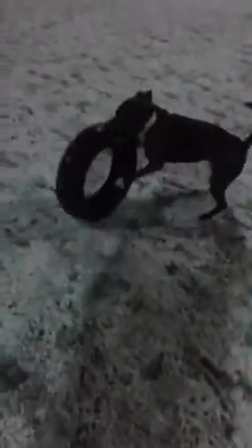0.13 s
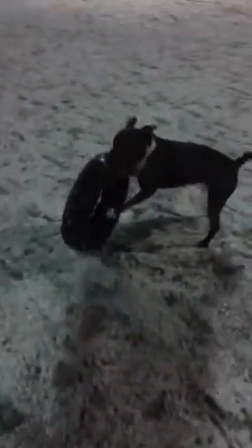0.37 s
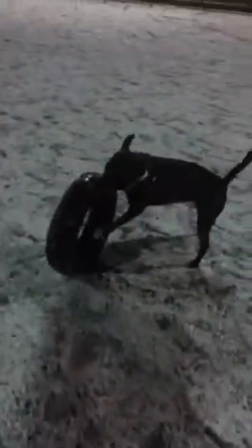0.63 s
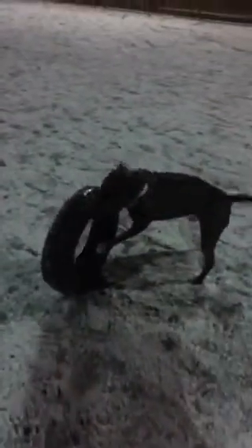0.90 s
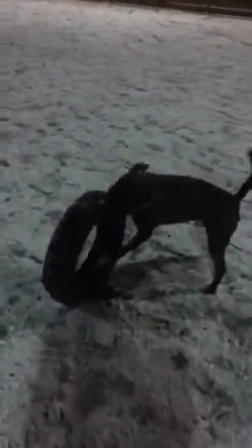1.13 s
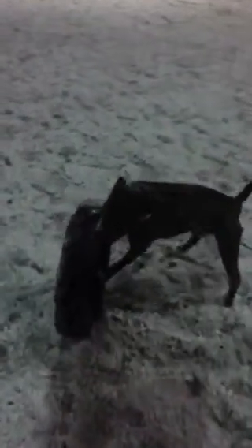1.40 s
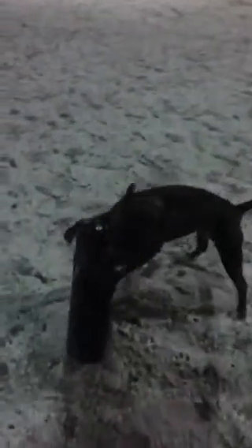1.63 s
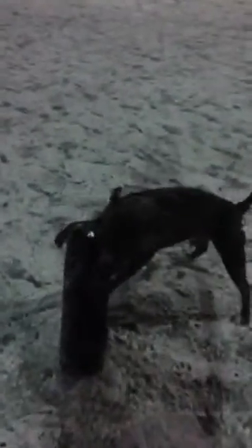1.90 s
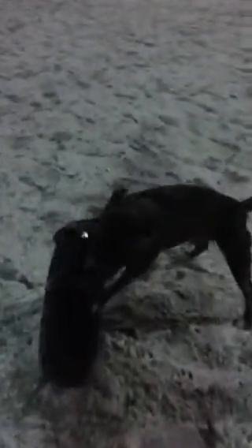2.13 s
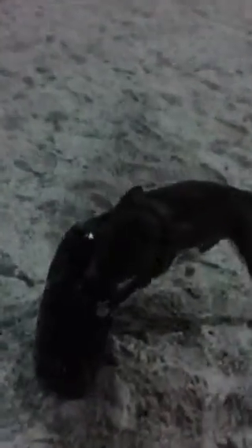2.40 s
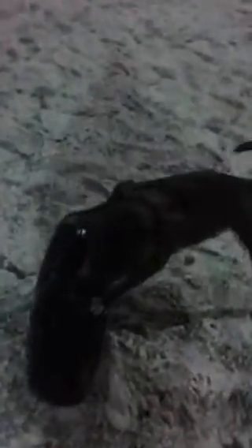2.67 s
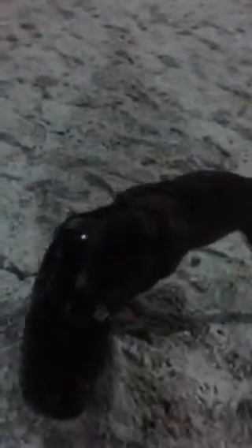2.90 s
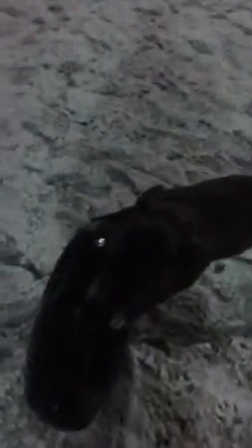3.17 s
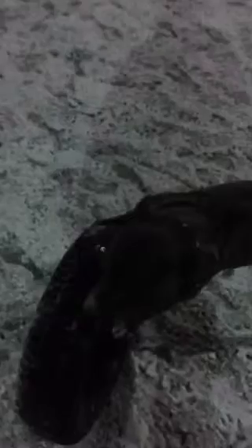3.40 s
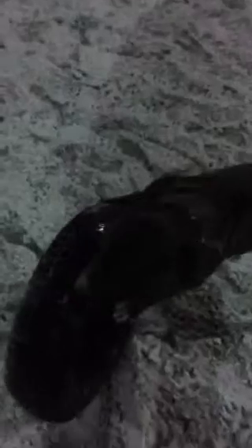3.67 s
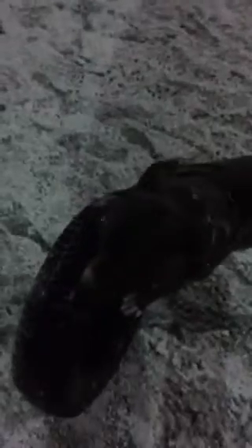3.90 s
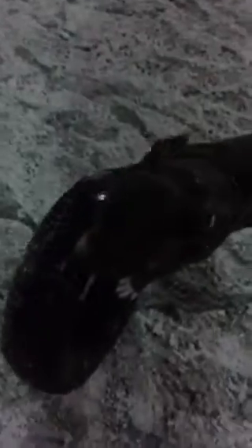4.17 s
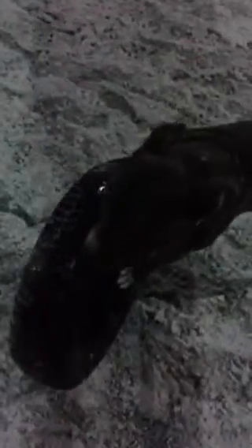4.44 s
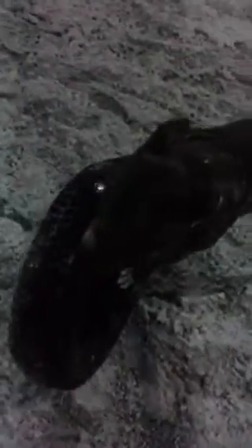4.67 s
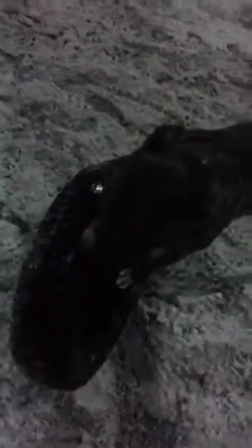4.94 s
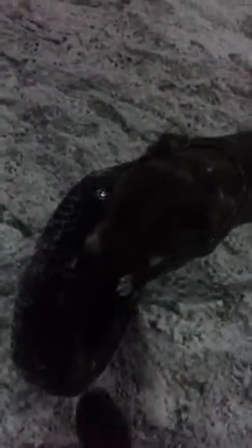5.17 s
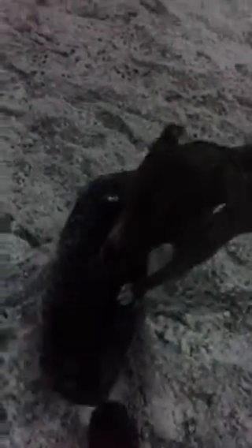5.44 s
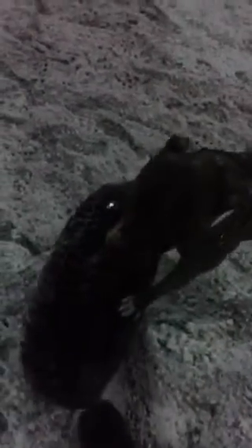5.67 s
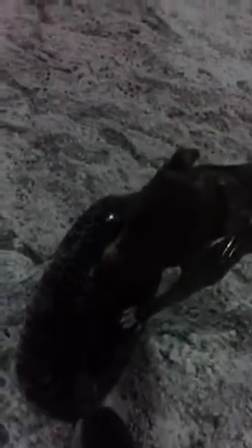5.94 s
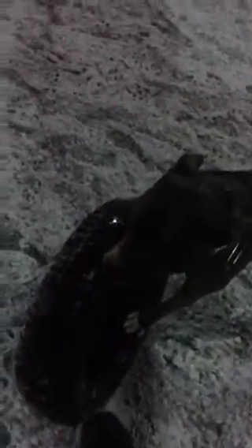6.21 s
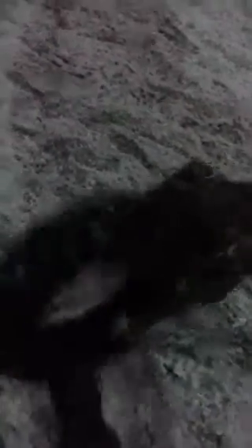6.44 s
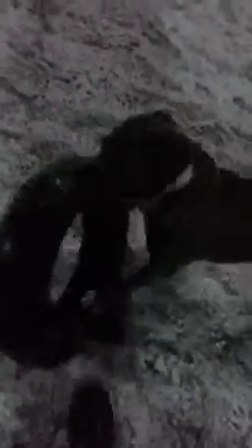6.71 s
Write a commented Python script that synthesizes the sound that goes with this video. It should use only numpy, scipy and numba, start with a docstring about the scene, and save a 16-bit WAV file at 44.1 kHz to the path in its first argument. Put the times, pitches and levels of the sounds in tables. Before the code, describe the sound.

Close outdoors, a dog growls with a tyre in its mouth. A clipped growl ends in a hiss, then paws scuff gritty ground and the tyre knocks once. A longer rattling growl follows with two soft thuds, a sigh and a faint snoring in-breath. Two more long growls surge in strength, separated by another sigh and a louder snore, over a faint low rumble.

```python
"""Open air, sand: a dog growls with a rubber tyre in its jaws.
Rough breath, chopped by the soft palate about 22 times a second, rings in chest, throat and mouth; teeth hiss.
The first three growls end in an unvoiced hiss; snoring breaths in follow the second and third.
Filtered noise makes open air, low rumble and scuffed sand. Decaying modes make the tyre's one knock,
damped low cycles its soft thuds on sand, band-passed clicks the teeth slipping on rubber."""
import sys
import numpy as np
from scipy import signal
from scipy.fft import rfft, irfft
from scipy.io import wavfile
from scipy.ndimage import map_coordinates
from numba import njit

SR = 44100
rng = np.random.default_rng(int(sys.argv[2]) if len(sys.argv) > 2 else 0)


def transcribe(signal):
    """Save signal, clipped to [-1, 1], as a 16-bit WAV file at the path in sys.argv[1]."""
    frames = np.atleast_2d(signal).T
    limited = np.clip(frames, -1, 1)
    pcm = np.round(limited * 32767).astype(np.int16)
    wavfile.write(sys.argv[1], SR, pcm)


def rack_gain(trim_db):
    """Turn a fader trim in dB into the linear factor to multiply a signal by."""
    fader = np.asarray(trim_db, float)
    return 10 ** (fader / 20)


N = 300756


def rms_one(x):
    """Scale to rms 1."""
    return x / np.sqrt(np.mean(x ** 2) + 1e-20)


def in_time(rows, outside=None):
    """Table columns as linear curves over time; ends hold unless outside is given."""
    s, *columns = np.transpose(rows)
    t = np.arange(N) / SR
    return [np.interp(t, s, column, outside, outside) for column in columns]


def drift(rate_hz):
    """Smooth random curve of spread about 1, with rate_hz knots a second."""
    knots = rng.standard_normal(400)
    return map_coordinates(knots, [np.arange(N) / SR * rate_hz + 3], order=3)


def coloured(spectrum):
    """Gaussian noise of rms 1, shaped by levels interpolated over log frequency."""
    hz, db = np.transpose(spectrum)
    grid_hz = np.maximum(np.arange(N // 2 + 1) * SR / N, 1)
    gain = rack_gain(np.interp(np.log(grid_hz), np.log(hz), db))
    return rms_one(irfft(rfft(rng.standard_normal(N)) * gain, N))


def peak(x, hz, width_hz):
    """Two-pole resonance, gain about 1 on top."""
    r = np.exp(-np.pi * width_hz / SR)
    feedback = [1, -2 * r * np.cos(2 * np.pi * hz / SR), r * r]
    return signal.lfilter([(1 - r * r) / 2, 0, (r * r - 1) / 2], feedback, x)


def resonances(x, table, wander_db=0.):
    """Parallel double resonances of alternating sign, each swelling alone; unswollen, white noise keeps its rms."""
    def double(v, hz, width_hz):
        """Two equal resonances in series, widened since the cascade narrows."""
        return peak(peak(v + 1e-18, hz, 1.69 * width_hz), hz, 1.69 * width_hz)

    impulse = np.eye(1, 8192)[0]
    response, out = 0, 0
    for k, (hz, width_hz, db) in enumerate(table):
        gain = (-1) ** k * rack_gain(db)
        response = response + gain * double(impulse, hz, width_hz)
        out = out + gain * double(x * rack_gain(wander_db * drift(7.9)), hz, width_hz)
    return out / np.sqrt(np.sum(response ** 2))


@njit
def glide(x, c, r):
    """Two-pole resonance whose centre moves with feedback c, pole radius r."""
    out = np.zeros(len(x))
    for i in range(2, len(x)):
        out[i] = x[i] - x[i - 2] + c[i] * out[i - 1] - r * r * out[i - 2]
    return out


def moving(x, hz, width_hz):
    """Double resonance with a moving centre; white noise of rms 1 comes out near rms 1."""
    r = np.exp(-np.pi * width_hz / SR)
    c = 2 * r * np.cos(2 * np.pi * hz / SR)
    top_one = glide(glide(x, c, r), c, r) * ((1 - r * r) / 2) ** 2
    return top_one * np.sqrt(2 * SR / (np.pi * width_hz))


def flapping(counts, breaths):
    """One row (s, level dB, dip dB) per palate flap; levels scatter, the last flap of a breath dips deep."""
    last_dip_db, scatter_db = 27, 0.96
    rows = []
    for count, breath in zip(counts, breaths):
        at_s, so_far = np.transpose(count)
        s = np.interp(np.arange(so_far[-1] + 1), so_far, at_s)
        knots_s, db, dip_db = np.transpose(breath)[:3]
        dips_db = np.r_[np.interp(s[:-1] + .02, knots_s, dip_db), last_dip_db]
        levels_db = np.interp(s, knots_s, db) + scatter_db * rng.standard_normal(len(s))
        rows += zip(s, levels_db, dips_db)
    return rows


def palate(flaps, depth, lead_s, hold_s=0.007, close_s=0.015, open_s=0.011):
    """Airway gain: opens for each flap, holds around it, then sags by depth times the dip; lead_s runs it early."""
    s, db, dip_db = np.transpose(flaps)
    gap_s = np.diff(s, append=s[-1] + 1)
    held_db, shut_db = db - 1.5, db - depth * dip_db
    shut_s = s + np.minimum(gap_s / 2, close_s)
    reopen_s = s + gap_s - np.minimum(gap_s / 2.2, open_s)
    times = np.stack([s - hold_s, s + hold_s, shut_s, reopen_s], 1).ravel()
    times = np.maximum.accumulate(np.r_[s[0] - hold_s - .003, times])
    # silent between breaths
    levels_db = np.stack([held_db, held_db, shut_db, np.where(gap_s > .12, -90, shut_db)], 1).ravel()
    levels_db = np.r_[-90, levels_db]
    return rack_gain(np.interp(np.arange(N) / SR + lead_s, times, levels_db, -120))


def folds(per_s, jitter, spread_db, noise):
    """Uneven vocal-fold slaps, each followed by a puff of turbulence; returns their mix and the puff envelope."""
    draws = rng.standard_normal((2500, 2))
    at = np.cumsum(SR / per_s * np.exp(jitter * draws[:, 0])).astype(int)
    slaps = np.zeros(N)
    slaps[at[at < N]] = rack_gain(spread_db * draws[at < N, 1])
    decay = np.exp(-1 / (0.005 * SR))
    puffs = rms_one(signal.lfilter([1], [1, -decay], slaps) + 0.24)
    turbulence = puffs * rng.standard_normal(N)
    return np.sqrt(1 - noise) * rms_one(slaps) + np.sqrt(noise) * turbulence, puffs


def air():
    """Steady open-air floor: coloured noise."""
    # spectrum: f/Hz, relative density/dB per Hz
    air_spectrum = [(18, -34), (30, -23), (123, -5), (332, -4), (1200, -6.5), (2000, -14.5), (3780, -22.5),
                    (5310, -28), (15500, -32)]
    return rack_gain(-57) * coloured(air_spectrum)


def rumble():
    """Lumpy lows of air and tugging: noise between about 60 and 135 Hz."""
    # t/s, level/dB
    rumble_levels = [(0, -54), (.09, -43), (.36, -53.5), (.68, -55), (.93, -52), (1.67, -49.5), (2.05, -41),
                     (2.18, -53), (2.66, -48), (4.25, -60.5), (4.42, -41), (4.55, -53), (5.0, -53),
                     (6.82, -57)]
    band = signal.butter(2, [60, 135], "band", fs=SR, output="sos")
    low = signal.sosfilt(band, rng.standard_normal(N))
    return rms_one(low * rack_gain(6.1 * drift(22))) * rack_gain(in_time(rumble_levels)[0])


def sand():
    """Paws scuff: dense random grain impulses ring the hollows in the sand."""
    # scuffs: t/s, level/dB
    scuff_levels = [(.27, -61), (.42, -64), (.445, -57), (.47, -60), (.51, -63), (.52, -49.5), (.58, -50),
                    (.6, -65), (.69, -56)]
    # hollows in the sand: f/Hz, width/Hz, relative level/dB
    grit = [(600, 400, 1), (1200, 180, 1), (1750, 210, -11), (2240, 280, -4), (3780, 770, -8.5)]
    grains_per_s = 4000
    struck = rng.random(N) < grains_per_s / SR
    size = rack_gain(4 * np.minimum(rng.exponential(1, N), 2.5))
    grains = rms_one(struck * size * rng.standard_normal(N))
    return resonances(grains * rack_gain(in_time(scuff_levels, outside=-120)[0]), grit, wander_db=7.0)


def thuds():
    """Tyre lands softly on sand: a few damped low cycles each."""
    # t/s, relative level/dB, f/Hz
    landings = [(0.463, -33.5, 91), (.5, -36, 79), (1.012, -25.5, 88.5), (1.215, -23, 186)]
    out, t = np.zeros(N), np.arange(4000) / SR
    for s, db, hz in landings:
        cycles = hz * t
        envelope = cycles * np.exp(1 - 1.8 * cycles)
        out[round(s * SR):][:len(t)] += rack_gain(db) * envelope * np.sin(2 * np.pi * cycles)
    return out


def ticks():
    """A tooth slips on the rubber: clicks through a 2.5-9 kHz band."""
    # t/s, relative level/dB
    slips = [(1.224, -32), (1.664, -25), (6.475, -36)]
    clicks = np.zeros(N)
    for s, db in slips:
        clicks[round(s * SR)] = rack_gain(db)
    band = signal.butter(2, [2500, 9000], "band", fs=SR, output="sos")
    return signal.sosfilt(band, clicks + 1e-18) * rack_gain(8.0)


def knock():
    """A tick, the full blow and a weak third contact ring the tyre's decaying modes."""
    # tyre modes: f/Hz, relative level/dB, t60/s
    tyre_modes = [(170, -5, 0.025), (512, 0.5, 0.058), (665, -1.5, 0.024), (910, -11, 0.055),
                  (1200, -5, 0.028), (1640, -6.5, 0.0072), (3620, -7.5, 0.0075), (5000, -20, 0.0098),
                  (7640, -16.5, 0.0035)]
    knock_s, knock_db = .702, -19.5
    out, t = np.zeros(N), np.arange(8000) / SR
    ring = np.zeros(len(t))
    for k, (hz, db, t60_s) in enumerate(tyre_modes):
        ring += (-1) ** k * rack_gain(db - 60 * t / t60_s) * np.sin(2 * np.pi * hz * t)
    for lag_s, db in [(0, -5), (.0012, 2), (.004, -11)]:
        at = round((knock_s + lag_s) * SR)
        out[at:at + len(t)] += rack_gain(knock_db + db) * ring
    return out


def sighs():
    """Unvoiced air through an opening mouth: broad hiss, a moving resonance and a hollow above it."""
    # one table a sigh: t/s, relative level/dB, mouth resonance f/Hz, hollow f/Hz
    last_air = [
        [(.07, -42, 2270, 3100), (.095, -41.5, 2360, 3130), (.2, -48, 2810, 3250), (.3, -70.5, 2730, 3320)],
        [(1.99, -50.5, 1927, 2950), (2.06, -36, 2250, 3200), (2.165, -47.5, 2600, 3430),
         (2.195, -52, 2700, 3400)],
        [(4.37, -53, 1900, 3200), (4.41, -40, 1970, 2970), (4.47, -36, 2160, 2640), (4.53, -44, 2090, 2730),
         (4.58, -69, 2050, 2770)],
    ]
    # broad hiss: f/Hz, relative density/dB per Hz
    hiss_spectrum = [(59, -44), (100, -8), (447, -9.5), (564, 1), (1460, -6), (2130, -6), (3120, -22),
                     (3540, -17), (4190, -15.5), (15500, -32)]
    out, white = np.zeros(N), rng.standard_normal(N)
    broad = coloured(hiss_spectrum) * rack_gain(4.24 * drift(45))
    hollow_width_hz = 700
    for rows in last_air:
        level_db = in_time(rows, outside=-120)[0]
        _, mouth_hz, hollow_hz = in_time(rows)
        breath = rack_gain(5.0) * broad
        breath += rack_gain(-1.0) * moving(white, mouth_hz, 270)
        breath += rack_gain(-14) * moving(white, hollow_hz + 650, 400)
        # scaled to unit gain on top, so that subtracting cancels
        hollow = moving(breath, hollow_hz, hollow_width_hz) / np.sqrt(2 * SR / (np.pi * hollow_width_hz))
        out += rack_gain(level_db) * (breath - hollow)
    return out


def snore():
    """Breathing in: slaps slower than in the growl, chopped by the palate, ring nose and throat."""
    # one table a breath: t/s, flaps so far
    snore_count = [
        [(2.246, 0), (2.472, 6)],
        [(4.615, 0), (4.748, 4), (4.833, 7), (4.925, 10)],
    ]
    # one table a breath: t/s, relative flap level/dB, dip after it/dB (before depth)
    snore_levels = [
        [(2.246, -29, 5), (2.33, -35, 6.5), (2.43, -37.5, 8), (2.472, -49, 6)],
        [(4.615, -30, 0), (4.65, -28.5, 4.5), (4.71, -24.5, 3.5), (4.83, -22, 7), (4.9, -36.5, 0.5)],
    ]
    # f/Hz, width/Hz, relative level/dB
    nose = [(100, 45, 5), (257, 66, -1), (516, 205, 0), (1368, 210, -8), (1800, 65, -10),
            (2150, 430, -17.5), (3450, 270, -24), (4430, 580, -27.5), (5740, 1900, -29), (8100, 10600, -41)]
    voice, _ = folds(per_s=100, jitter=.15, spread_db=3, noise=.65)
    gate = palate(flapping(snore_count, snore_levels), depth=1.9, lead_s=0.0037)
    return resonances(voice * gate, nose, wander_db=1.0) * rack_gain(0.5)


def chest(voice, flaps, level_db):
    """Low voice: an unsteady sine at the fundamental, mixed with the rough source in the chest resonances."""
    # t/s, mean pitch f/Hz, clean share/0-1, level beyond what effort gives/dB
    hum = [(.05, 155.6, 0.4, -6.5), (.85, 154.3, 0.8, 4.5), (1.1, 198, 0.7, -9.5), (1.3, 200.7, 1, 1),
           (1.5, 195.6, 1, -4), (1.6, 170.7, 0.7, -3), (1.8, 186.6, 0.46, -3.5), (2.05, 139.6, 0.96, -3),
           (2.62, 180.3, .2, -4.5), (2.8, 258, 0.22, 3.5), (3.0, 192.1, 0.1, 2.5), (3.2, 223, 0.3, -0.5),
           (3.6, 194.6, 0.01, 5), (3.78, 238.7, 0.4, -2.5), (4.03, 206.6, 0.4, 3.5),
           (4.45, 249.5, 0.53, 2.5), (5.1, 210.5, 0.04, 2), (5.38, 214.5, 0.14, 7), (5.46, 280, 0.9, -2),
           (5.68, 232.3, 0.63, 2), (6.1, 205, 0.47, 4.5), (6.4, 188.6, 0.26, 0.5), (6.55, 270, 0.29, 3),
           (6.82, 284.5, 0.66, -8)]
    # f/Hz, width/Hz, relative level/dB
    chest_modes = [(147, 57, 0), (218, 106, -3.5), (459, 45, 2.5)]
    hz, clean, extra_db = in_time(hum)
    gate = palate(flaps, depth=1.48, lead_s=0.012) * rack_gain(level_db + extra_db + 1.53)
    phase = 2 * np.pi * np.cumsum(hz * (1 + 0.04935 * drift(40))) / SR
    tone = np.sqrt(2) * np.sin(phase) * rack_gain(2.3 * drift(30))
    rough = resonances(np.sqrt(1 - clean) * voice * gate, chest_modes)
    return np.sqrt(clean) * tone * gate + rough


def growl():
    """One rough source rings chest, throat, mouth and teeth; the palate gates the chest first, the throat least."""
    # one table a growl: t/s, flaps so far; flaps tend to be faster on fresh breath
    flap_count = [
        [(-.006, 0), (.072, 3)],
        [(.827, 0), (1.044, 5), (1.169, 8), (1.455, 14), (1.64, 18), (2.046, 26)],
        [(2.612, 0), (2.718, 3), (2.855, 6), (2.973, 9), (3.337, 17), (3.587, 22), (3.815, 27), (4.204, 35),
         (4.447, 40)],
        [(5.021, 0), (5.131, 3), (5.39, 9), (5.636, 15), (5.77, 18), (6.005, 23), (6.261, 28), (6.455, 32),
         (6.497, 33), (6.55, 34), (6.73, 38), (6.82, 40)],
    ]
    # one table a growl: t/s, effort as relative flap level/dB, dip between flaps/dB (before depth),
    # throat f/Hz, relative mouth level/dB, relative front-of-mouth level/dB
    efforts = [
        [(.02, -26, -5, 763, -10, -19), (.072, -31, 5.5, 735, -5, -16)],
        [(.827, -47, 20, 603, -30, -29), (.95, -43, -4, 532, -46, -45), (1.04, -26.5, 9, 682, -1, -26),
         (1.17, -18, 8, 592, -6, -21), (1.26, -23.5, 3.5, 560, -13, -24), (1.45, -20.5, 5, 503, -8, -33),
         (1.6, -22.5, 7.5, 543, -9.5, -19.5), (1.77, -26.5, 4, 473, -6.5, -22),
         (1.92, -22, 4.5, 523, -8.5, -21.5), (2.046, -27, 3.5, 570, -6.5, -11)],
        [(2.607, -39, 36, 590, -17, -30), (2.7, -33.5, 16, 555.5, -11, -37), (2.8, -31.5, 6, 540, -48, -48),
         (2.875, -27, 2, 589, -26, -40), (2.9, -22.5, 4, 674, -12, -23), (3.0, -8.5, 3.5, 700, -9.5, -32),
         (3.11, -22.5, 5, 518, -8, -19), (3.25, -26, 4, 495, -8, -23.5), (3.4, -23, 6, 545.7, -6, -28),
         (3.63, -19, 5.5, 660, -14.5, -25), (3.68, -12, 0, 700, -9, -38), (3.72, -13.5, 6.5, 673, -9.5, -27),
         (3.83, -29, 2.5, 460, -5.5, -24.5), (3.97, -19.5, 1.5, 610, -7, -26), (4.07, -17, 5.5, 650, -17, -24),
         (4.2, -15.5, 7, 709, -7, -24), (4.3, -22, 4.5, 568, -8, -27), (4.44, -24, 0.5, 665, -4.5, -19)],
        [(5.018, -35, 58, 667, -12, -40), (5.07, -22.5, 9.5, 640, -9, -31), (5.18, -24.5, 9.5, 620, -5, -29),
         (5.3, -19, 15, 660, -8.5, -32), (5.39, -17, 8.5, 626, -8, -37), (5.43, -10, 1.3, 697, -2.5, -48),
         (5.55, -12, 2.5, 728, -6, -40), (5.62, -22, 4.5, 768, -1, -23), (5.8, -22.5, 9.5, 610, -4.5, -27),
         (5.88, -21.5, 5, 569, -10.5, -29), (6.0, -23.5, 6, 542, -8, -23), (6.11, -21.5, 8.5, 612, -10.5, -29),
         (6.38, -21.5, 6, 610, -9.5, -30), (6.47, -15, 6, 645, -15, -31), (6.556, -9, 4, 668, -6.5, -26),
         (6.62, -13, 3, 703, 0.8, -17.5), (6.72, -21.5, -0.5, 758, -5, -14.5), (6.79, -11, 1.6, 780, -7.5, -24)],
    ]
    # hiss past the teeth: t/s, brightest resonance f/Hz, relative level/dB
    lip_gap = [(.02, 5450, -25.5), (.08, 5500, -13), (.95, 5400, -25.5), (1.07, 4700, -32),
               (1.28, 4740, -33), (1.45, 6200, -30.5), (1.68, 4670, -26), (1.82, 6400, -23),
               (2.05, 5264, -21), (2.76, 5140, -18.5), (2.98, 5000, -31.5), (3.24, 5900, -30.5),
               (3.45, 5440, -22), (3.73, 4760, -30.5), (3.9, 5900, -28), (4.2, 4800, -28),
               (4.32, 5500, -29.5), (4.44, 5200, -19.5), (5.38, 4700, -27.5), (5.44, 4800, -21),
               (5.58, 5070, -29.5), (5.8, 5494, -27), (6.2, 5100, -26.5), (6.48, 4900, -33.5),
               (6.6, 4850, -20), (6.8, 4850, -26.5)]
    # upper mouth resonance, set by the tongue: t/s, f/Hz
    tongue = [(1.8, 1570), (2.05, 1800), (2.9, 1550), (3.4, 1570), (3.7, 1750), (3.9, 1517), (4.2, 1764),
              (4.45, 1800), (5.0, 1749)]
    # fixed resonances: f/Hz, width/Hz, relative level/dB
    mouth_modes = [(1407, 90, 1)]
    front_modes = [(2165, 430, 21), (2700, 69, -21)]
    jaw_modes = [(3700, 250, 0), (4510, 180, -5.5)]
    teeth_modes = [(4700, 300, 1.2), (5900, 460, 1), (6860, 1440, -6.5), (9460, 600, -4),
                   (11400, 2100, -8.5), (14800, 2100, -14.5)]

    voice, puffs = folds(per_s=150, jitter=.35, spread_db=0.0, noise=0.72)
    flaps = flapping(flap_count, efforts)
    effort_db, _, throat_hz, mouth_db, front_db = in_time(sum(efforts, []))
    lips_hz, teeth_db = in_time(lip_gap)
    push_db = effort_db + 22   # against the usual effort
    chest_db = np.minimum(-15 - 1.28 * push_db, -5.5)   # sinks with effort, under a ceiling

    throat = moving(voice * palate(flaps, depth=1.04, lead_s=0.0048), throat_hz, 193) * rack_gain(2.0)
    upper = voice * palate(flaps, depth=1.86, lead_s=0.0024)
    mouth_air = upper * rack_gain(mouth_db + 2.5)
    # second resonance rises with the throat
    mouth = moving(mouth_air, 720 + 0.34 * throat_hz, 147) * rack_gain(-2.0)
    # fills in as the jaws part
    mouth -= resonances(mouth_air * rack_gain(1.44 * mouth_db - 5.0), mouth_modes, wander_db=5.5)
    mouth += moving(mouth_air, in_time(tongue)[0], 400) * rack_gain(-5)
    # the stuffed mouth passes little above its top resonance
    lowpass = signal.cheby2(6, 36, 2300, fs=SR, output="sos")
    muffled = signal.sosfilt(lowpass, throat + mouth)

    front = resonances(upper * rack_gain(front_db - 3.0), front_modes, wander_db=-1.5)
    # jaw rings most when the jaws part and the dog pushes
    jaw_air = upper * rack_gain(1.7 * mouth_db + 1.0 * push_db - 30.5)
    jaw = resonances(jaw_air, jaw_modes, wander_db=-1.0)

    hiss = puffs * rng.standard_normal(N) * palate(flaps, depth=1.54, lead_s=0.00056) * rack_gain(teeth_db - 4.5)
    teeth = resonances(hiss, teeth_modes, wander_db=4.0)
    # random signs decorrelate the moving part
    teeth += rack_gain(1) * moving(hiss * rng.choice([-1, 1], N), lips_hz, 720)
    return muffled + front + jaw + teeth + chest(voice, flaps, chest_db)


def scene():
    """Dog, tyre and sand over the open-air floor, one channel."""
    ground = air() + rumble() + sand()
    tyre = thuds() + ticks() + knock()
    dog = sighs() + snore() + growl()
    return (ground + tyre + dog)[None]


def roll_off(x):
    """The treble ends steeply here."""
    return signal.sosfilt(signal.butter(12, 15690, fs=SR, output="sos"), x)


def record(dry):
    """Tanh rounds the peaks; a steep low-pass cuts the top by 16 kHz."""
    rounded = 0.8 * np.tanh(dry / 0.92)
    lowpass = signal.cheby2(12, 60, 16000, fs=SR, output="sos")
    mix = signal.sosfilt(lowpass, rounded)
    return roll_off(mix)


dry = scene()
out = record(dry)
transcribe(out)
```